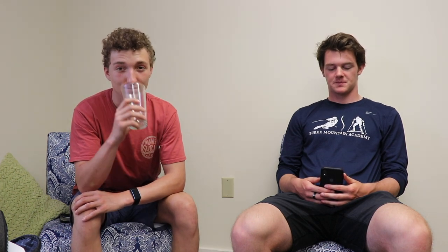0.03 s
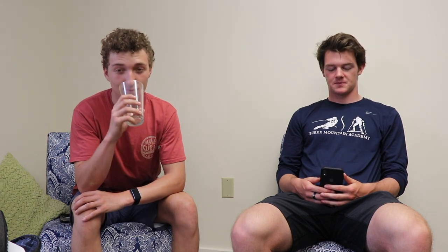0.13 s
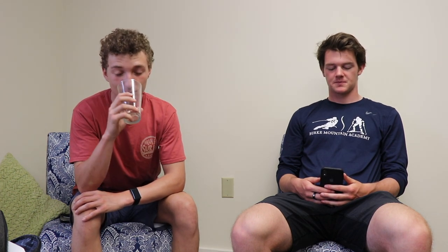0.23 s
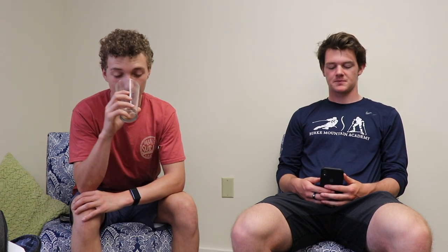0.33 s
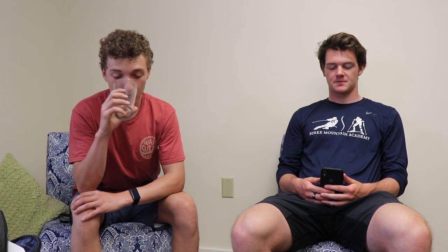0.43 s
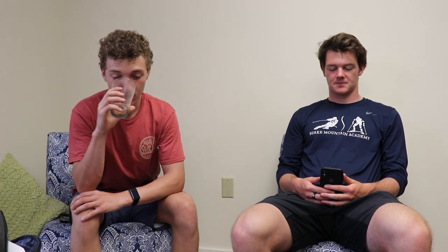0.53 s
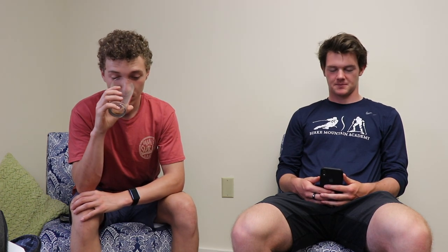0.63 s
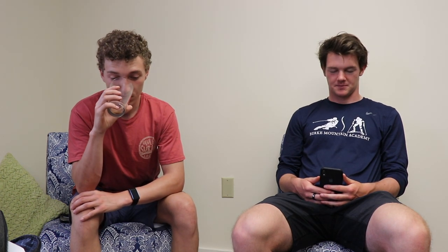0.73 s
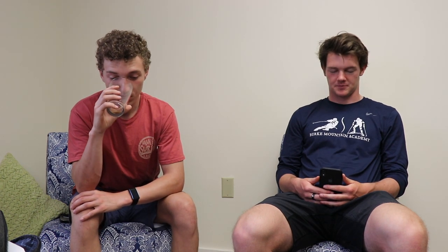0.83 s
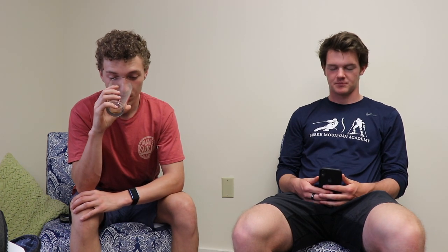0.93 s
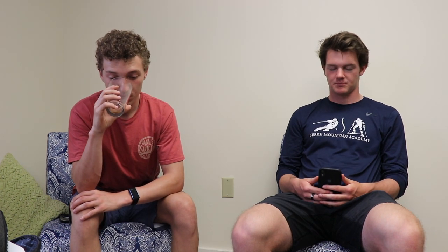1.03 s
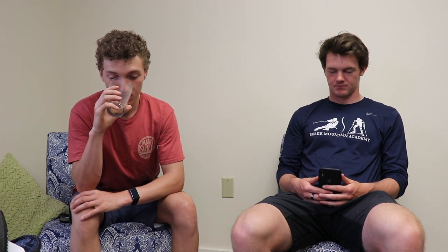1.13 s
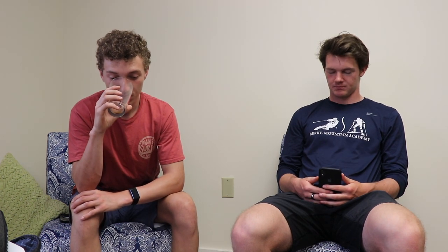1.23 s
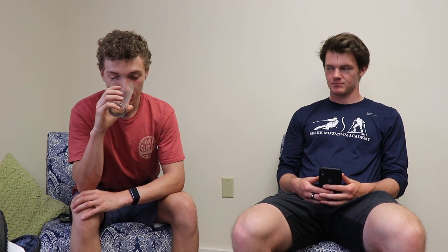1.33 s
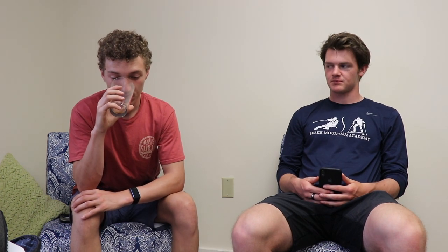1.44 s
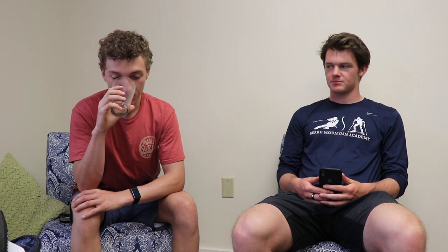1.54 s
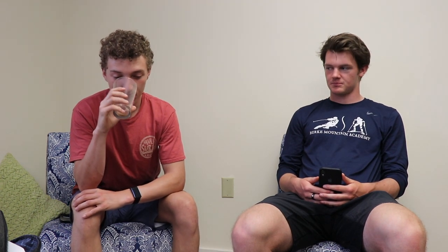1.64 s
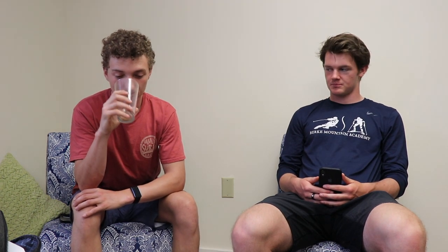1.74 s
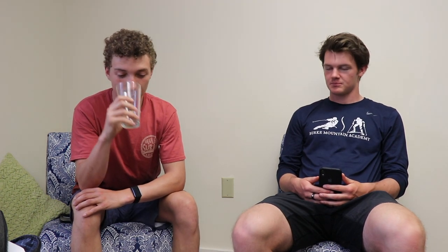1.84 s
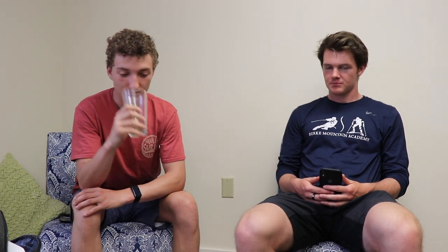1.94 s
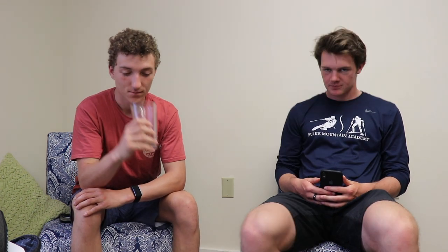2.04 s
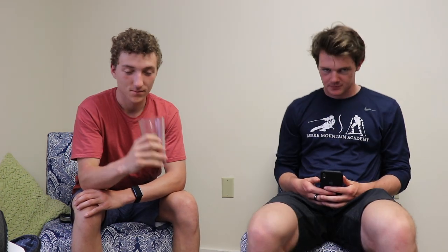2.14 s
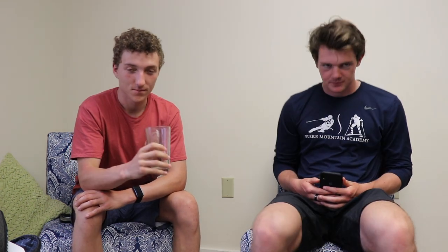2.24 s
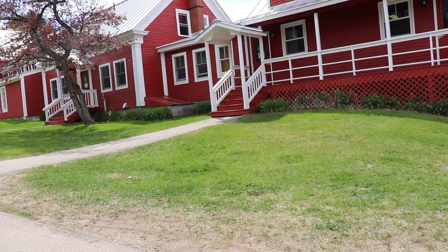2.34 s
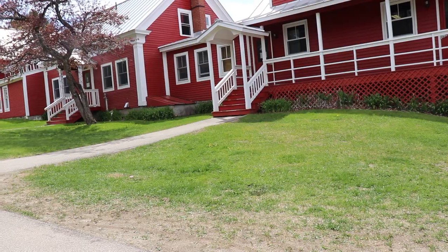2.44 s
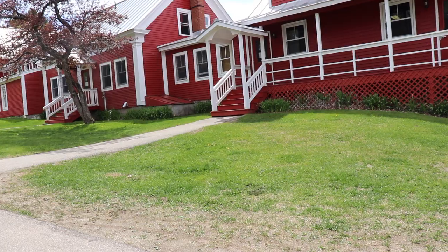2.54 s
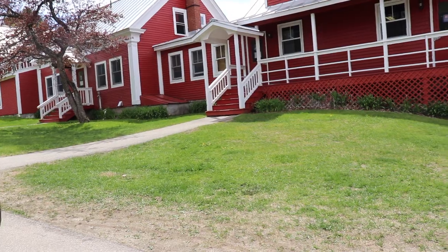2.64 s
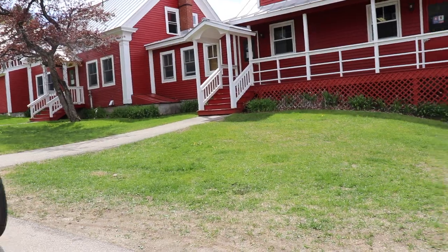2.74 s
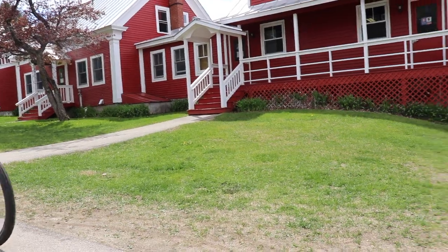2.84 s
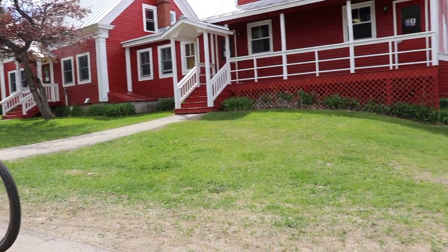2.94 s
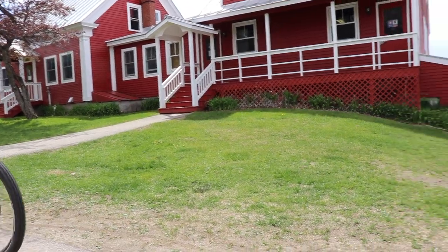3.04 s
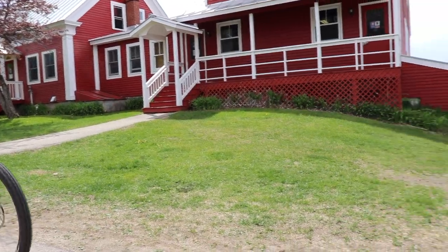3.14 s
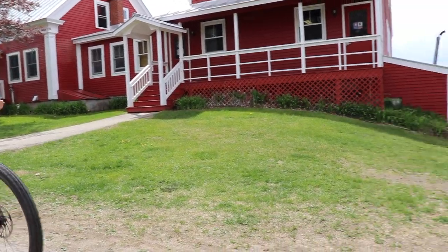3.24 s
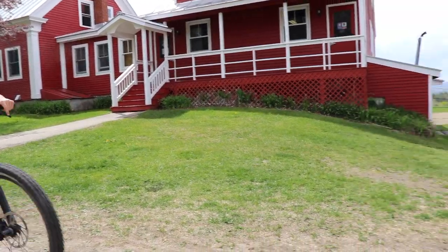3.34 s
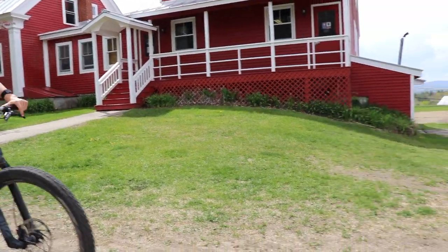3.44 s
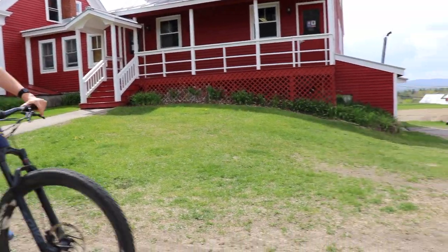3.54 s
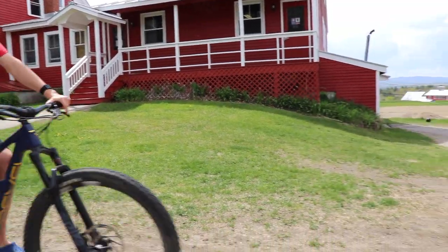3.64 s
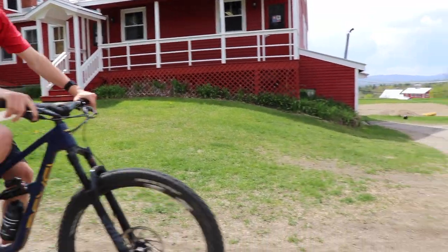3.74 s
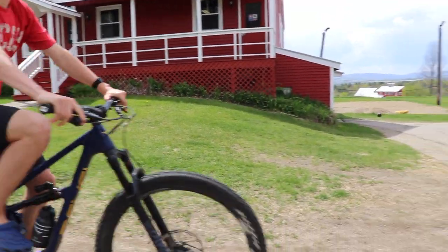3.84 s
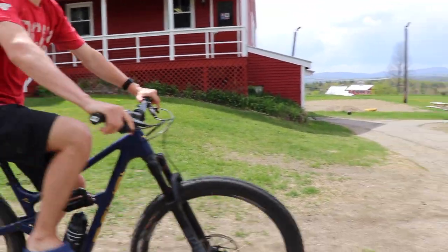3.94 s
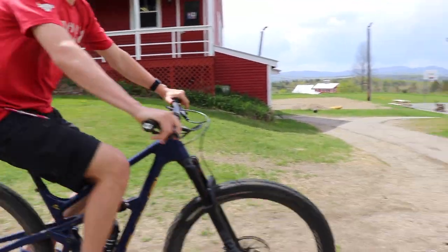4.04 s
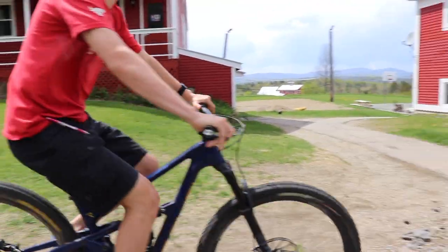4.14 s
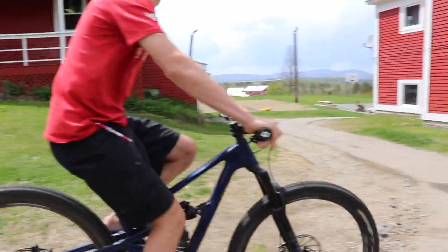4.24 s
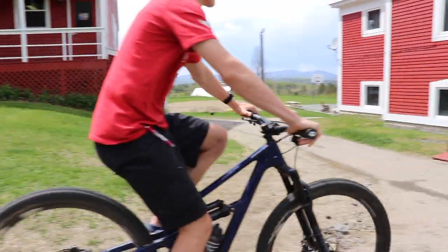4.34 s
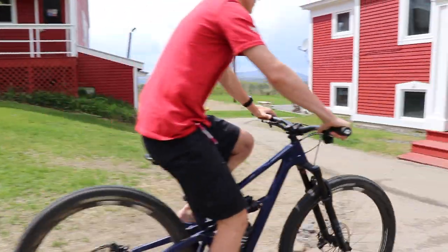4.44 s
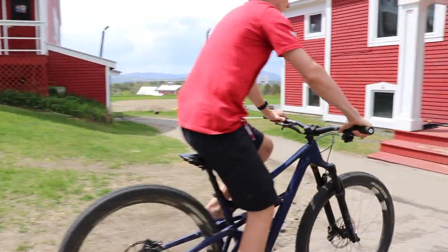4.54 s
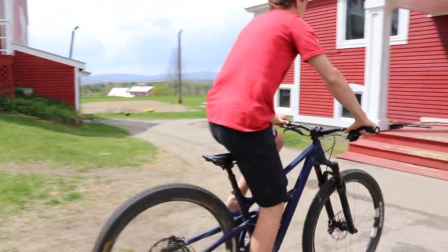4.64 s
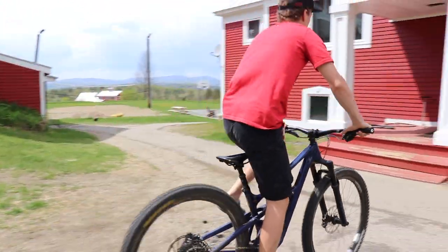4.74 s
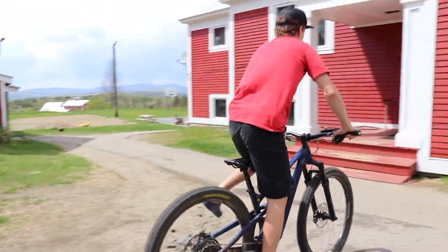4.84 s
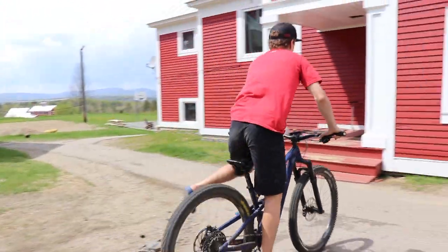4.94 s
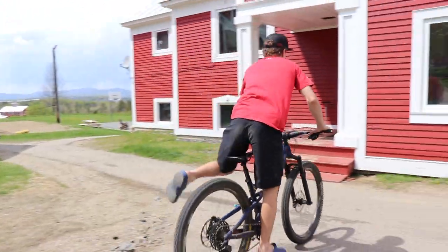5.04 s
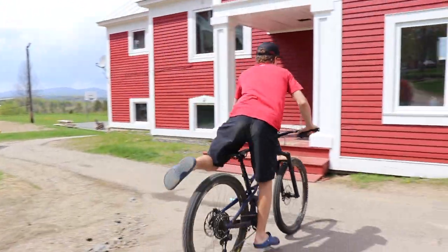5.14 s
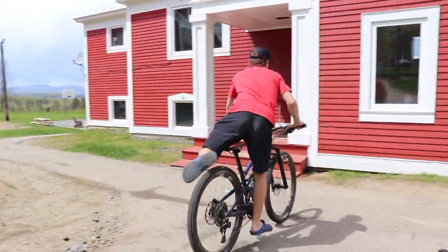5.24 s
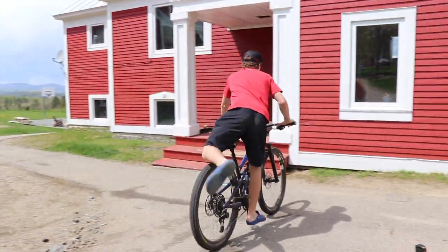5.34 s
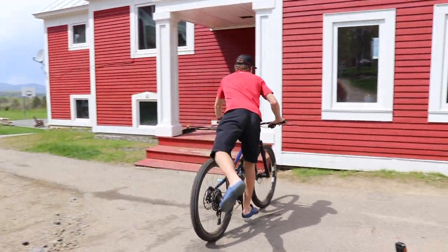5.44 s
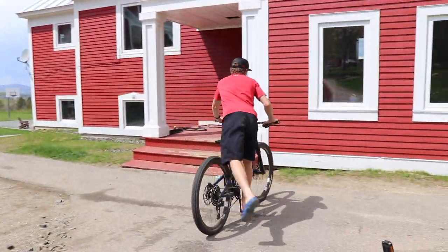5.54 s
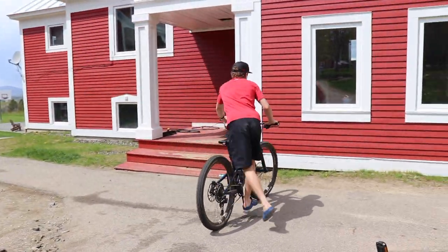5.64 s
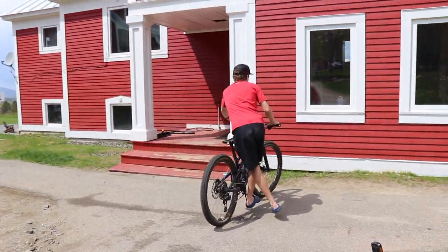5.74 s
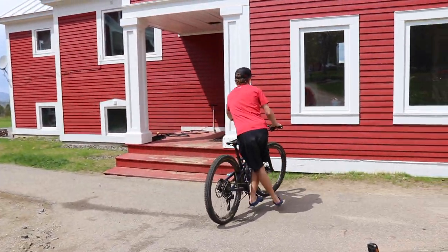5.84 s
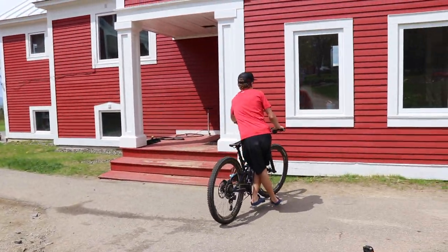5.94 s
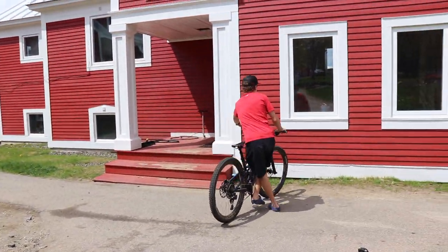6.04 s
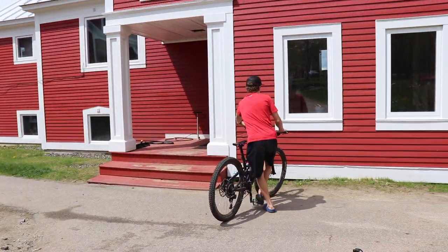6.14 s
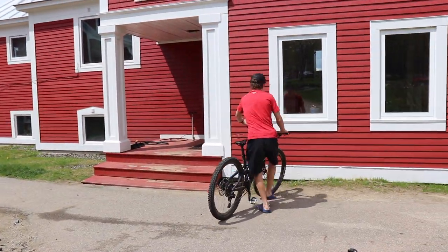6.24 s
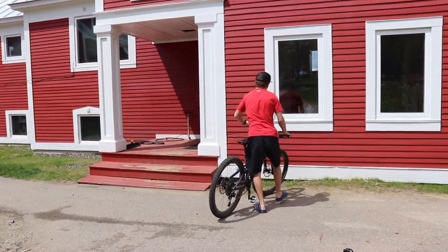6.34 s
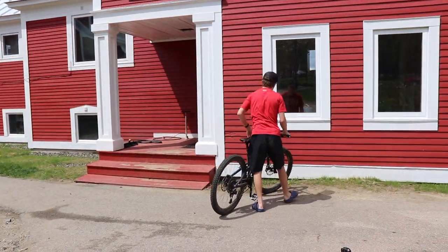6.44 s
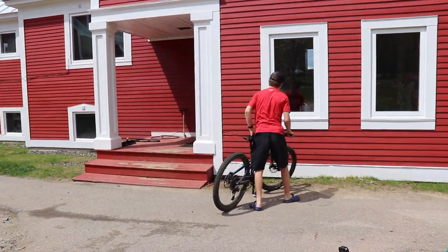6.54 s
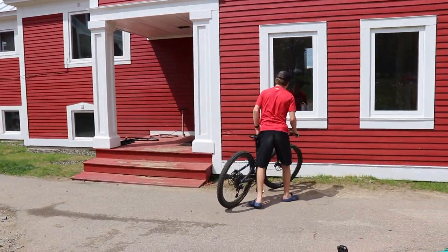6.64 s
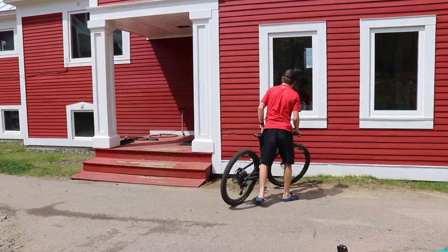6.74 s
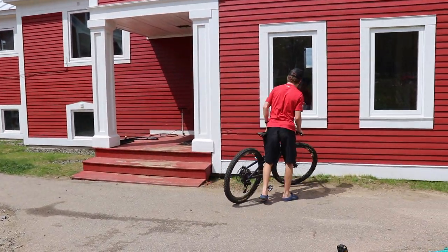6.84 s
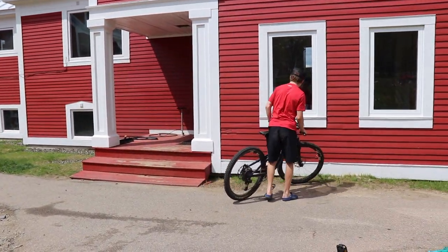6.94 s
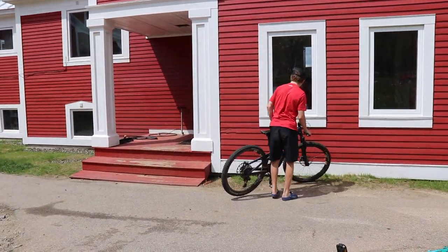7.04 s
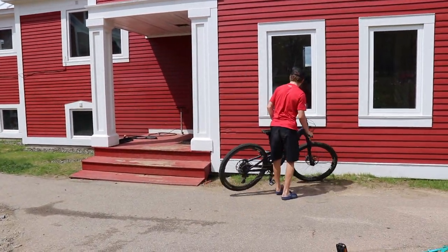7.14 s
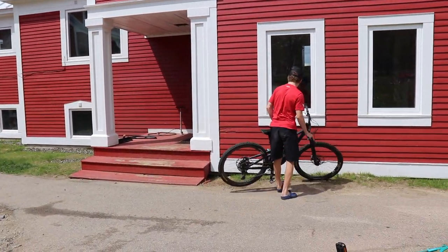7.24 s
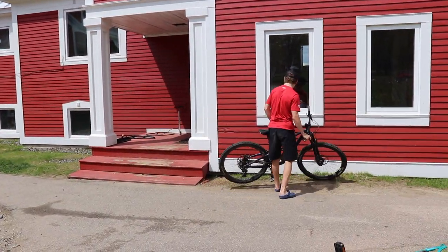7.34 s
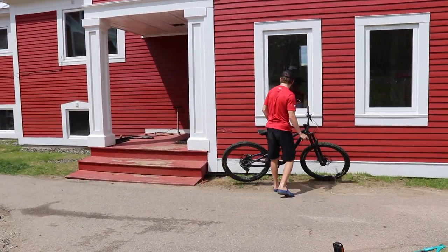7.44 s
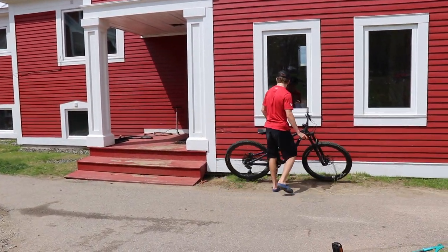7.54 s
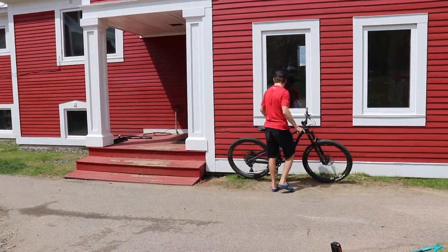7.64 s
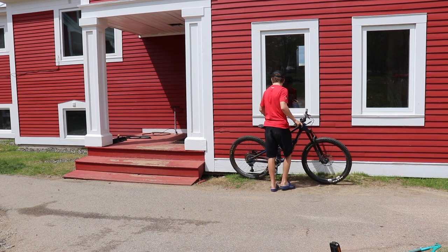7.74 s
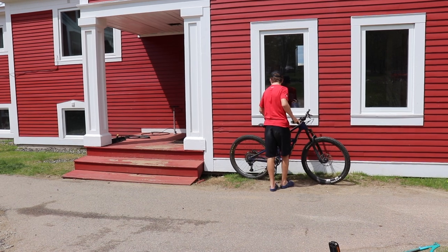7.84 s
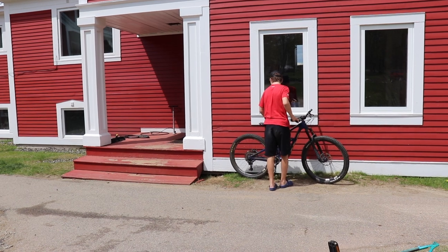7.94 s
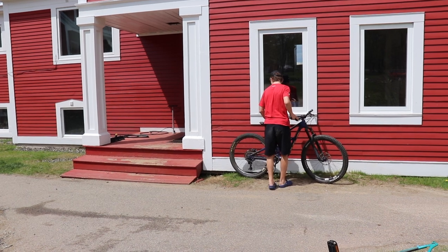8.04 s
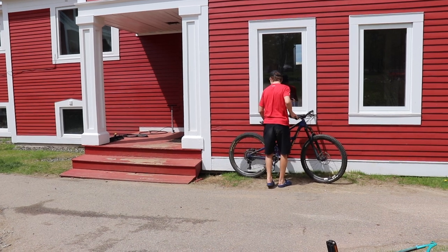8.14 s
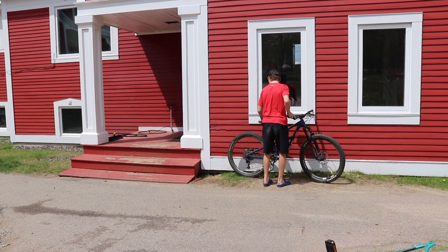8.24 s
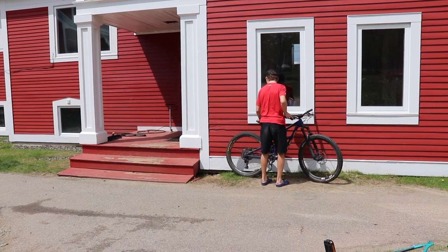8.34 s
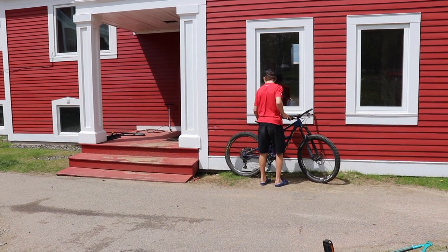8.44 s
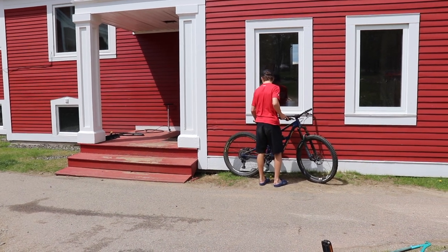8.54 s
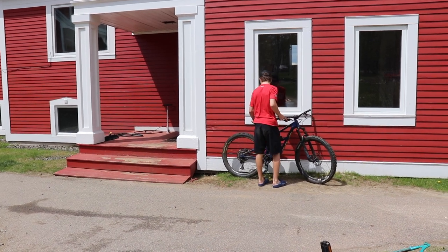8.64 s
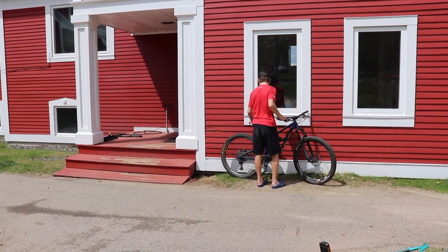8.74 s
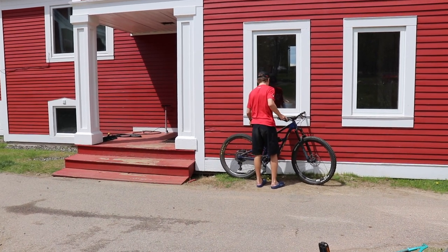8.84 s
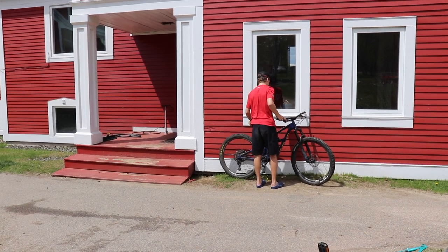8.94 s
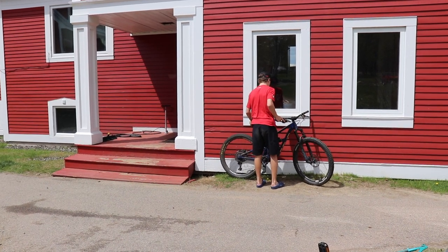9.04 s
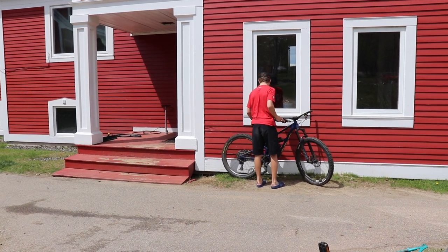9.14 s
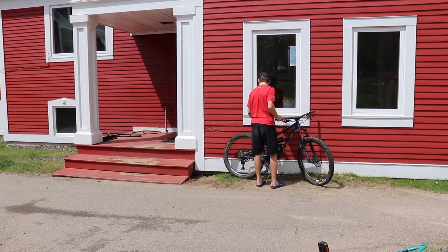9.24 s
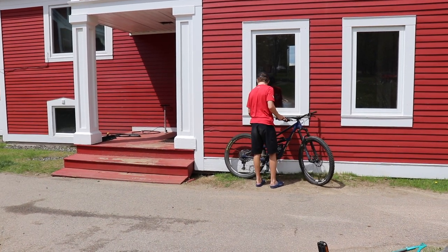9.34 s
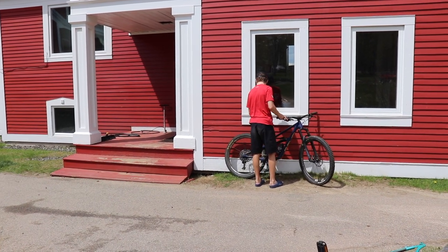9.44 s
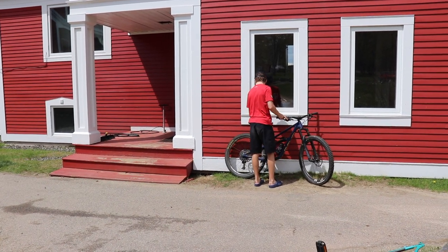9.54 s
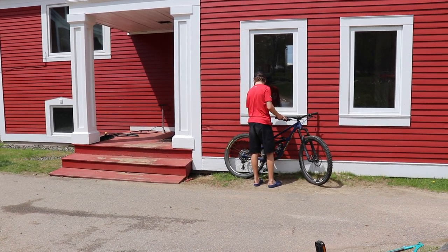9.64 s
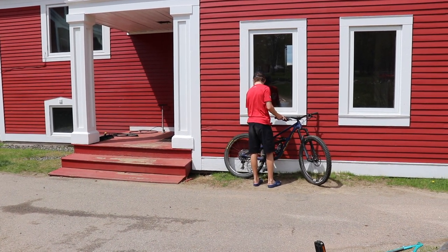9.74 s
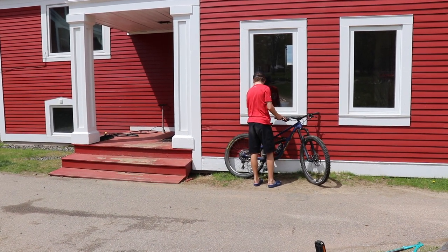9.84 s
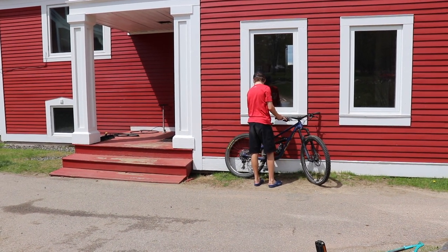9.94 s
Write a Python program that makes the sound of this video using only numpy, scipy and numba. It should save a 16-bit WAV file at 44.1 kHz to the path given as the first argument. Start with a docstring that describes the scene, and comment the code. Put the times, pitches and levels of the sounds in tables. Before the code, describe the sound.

A bicycle rolls in from the left over grit, its freewheel ratchet buzzing and slowing, then bumps a wall and clicks lightly.

```python
"""A quiet room with a rustle and one dull knock fades into a yard, where a bicycle rolls in from the left.
Its freewheel buzzes as four pawls (small spring catches) click over each tooth. Tyres and shoes
crunch grit and the tread hums. The frame clanks; the bicycle bumps a wooden wall and rolls a few
teeth more. A far bird chirps, and light gusts rumble on the microphone."""
import sys
import numpy as np
from scipy import signal
from scipy.fft import rfft, irfft
from scipy.io import wavfile
from scipy.ndimage import uniform_filter1d, map_coordinates
from numba import njit

SR = 44100
rng = np.random.default_rng(int(sys.argv[2]) if len(sys.argv) > 2 else 0)


def transcribe(signal):
    """Save signal, clipped to [-1, 1], as a 16-bit WAV file at the path in sys.argv[1]."""
    frames = np.atleast_2d(signal).T
    limited = np.clip(frames, -1, 1)
    pcm = np.round(limited * 32767).astype(np.int16)
    wavfile.write(sys.argv[1], SR, pcm)


N = 440118
T = np.arange(N) / SR
FADE_S = (1.89, 2.46)  # room into yard

# coasting; the pedals nearly catch the wheel at 4.02 s: t/s, teeth per second, relative level/dB
COAST = [(3.645, 41, -45), (3.9, 112, -39.5), (3.99, 56, -40.5), (4.02, 14, -37), (4.07, 40, -41.5),
         (4.14, 89, -36.5), (4.3, 98, -34.5), (4.51, 148, -26.5), (4.67, 127, -30.5), (5.22, 123, -34),
         (5.5, 112, -38.5), (5.95, 83, -39.5), (6.12, 38.6, -44.5), (6.45, 38, -43.5), (6.7, 63, -42),
         (6.95, 54, -42), (7.45, 50, -40.5), (7.62, 23, -42.5), (7.845, 27.4, -46)]
# single teeth while the wheel barely turns: t/s, time per tooth/s, relative level/dB
SLOW_TEETH = [(3.4148, .062, -43.5), (3.461, .101, -46), (3.5426, .082, -43.5), (3.607, .05, -45),
              (9.184, .0855, -40), (9.272, 0.072, -39), (9.3553, 0.09, -39.5), (9.4574, 0.14, -39.5)]
# where each pawl drops: share of one tooth step
PAWL_PLACES = [0, .17, .42, .49]
# how hard each pawl clicks: relative level/dB
PAWL_DB = [-2, -6, 0, -4]
def pawl_clicks():
    """Every pawl drops off every tooth. Gives the loudness outline of the clicks and their fading tails."""
    rate, coast_db = columns(COAST)
    turning = (T > COAST[0][0]) & (T < COAST[-1][0])
    teeth = np.cumsum(rate * turning) / SR
    fast, slow = np.zeros((2, N))
    for place, pawl_db in zip(PAWL_PLACES, PAWL_DB):
        timing, force = rng.standard_normal((500, 2)).T
        at = np.searchsorted(teeth, np.arange(500) + .02 + place + .012 * np.clip(timing, -1.5, 1.5))
        np.add.at(fast, at[at < N], undb(pawl_db + 2 * force[at < N]))
        for s, tooth_s, db in SLOW_TEETH:
            slow[int((s + place * tooth_s) * SR)] = undb(db + pawl_db)
    # a short click, then a fainter, longer tail
    fast, slow = (fading(v, .035) + undb(-15) * fading(v, .13) for v in (fast, slow))
    # even out the power, so faster clicking is not louder by itself
    power = uniform_filter1d(fast ** 2 * turning, SR // 8)
    power /= uniform_filter1d(1. * turning, SR // 8) + 1e-9
    held = np.clip(np.arange(N), *np.flatnonzero(turning)[[0, -1]])
    return fast * undb(coast_db) / np.sqrt(power[held]) + slow


# tone of the rattle: f/Hz, relative level/dB
HUB_TONE = [(530, -34), (900, -34), (1470, -13.5), (1790, -4), (1920, -3.5), (3150, 0.5), (5040, -13),
            (7310, -9), (8550, -10.5), (13700, -9.5), (16000, -12)]
# ringing of hub shell and spokes: f/Hz, width/Hz, relative level/dB
HUB_RINGS = [(2274, 25, 6), (2970, 11, 3.5), (3730, 16, -1), (6120, 63, 0), (7140, 200, 2.5),
             (7510, 690, 2), (9170, 170, -3), (10630, 370, -2), (13000, 260, -1), (14300, 560, -1)]
# strongest part of the buzz as the wheel turns towards us and away: t/s, f/Hz, boost/dB
BUZZ_PEAK = [(3.4, 2150, 16), (3.9, 2090, 12), (4.2, 2400, -2), (4.45, 3120, 4), (4.85, 2700, 8),
             (5.2, 2212, 11), (6.3, 2380, 6.5), (6.9, 2500, 5), (7.2, 2920, 4), (7.45, 3228, 2),
             (7.85, 2677, 2), (9.2, 2830, 1)]
def freewheel():
    """The clicking pawls rattle the hub and make its shell and spokes ring."""
    clicks = pawl_clicks()
    treble_size = np.std(passed(colour(pair(1), HUB_TONE), 5500, "high", order=4))
    rattle = undb(-1.5) / treble_size * colour(clicks * pair(.65), HUB_TONE)
    peak_hz, boost_db = columns(BUZZ_PEAK)
    hub = rattle + (undb(boost_db) - 1) * np.array([resonate(v, peak_hz, width=163.) for v in rattle])
    for hz, width, db in HUB_RINGS:
        # the wheel turns, so each ring swells, fades and shifts a little
        centre = hz * (1 + .0019 * drift(3.2))
        hub += undb(db + 2.7 * drift(15)) * np.array([resonate(v, centre, float(width)) for v in rattle])
    # from the side the hub is brighter
    bright_db = -.2 + 3.5 * direction()
    hub += (undb(bright_db) - 1) * passed(hub, 14300, "high", order=1)
    # the treble leans furthest to the left
    return passed(hub, 5340, "high") * follow(TREBLE_PAN_DB) - passed(hub, 6550, "low") * follow(MID_PAN_DB)


# steady rolling over grit: t/s, relative crunch level/dB, relative rumble level/dB
ROLLING = [(1.8, -58, -66), (2.07, -53.5, -54.5), (2.78, -49.5, -50.5), (3.23, -50.5, -46.5),
           (3.71, -40, -43), (4.4, -38, -39), (4.75, -33.5, -39), (5.33, -35, -41), (6.1, -40.5, -50),
           (6.45, -47.5, -54), (7.25, -54, -66), (7.7, -42, -50.5), (7.93, -46, -54), (8.05, -60.5, -63),
           (9.98, -63, -61)]
# shoes and tyres scuffing: peak t/s, relative level/dB, length/s
SCUFFS = [(6.218, -23, 0.064), (6.37, -41, 0.05), (6.591, -40.5, 0.15), (7.016, -42.5, 0.12),
          (7.495, -46.5, 0.069), (7.7, -39, 0.046), (8.134, -45.5, .06), (8.269, -41, 0.022),
          (8.377, -38.5, .06), (8.97, -52, 0.24), (9.646, -57, 0.047), (9.925, -59, .06)]
# tone of the grit: f/Hz, relative level/dB
CRUNCH_TONE = [(700, -20), (1100, -0.5), (1500, 3), (2300, 4), (3200, 1.5), (4500, -8), (7000, -11.5),
               (12000, -29)]
# tone of the tyre body: f/Hz, relative level/dB
RUMBLE_TONE = [(60, -16), (120, -9), (290, 4), (600, -1), (900, -8.5), (1400, -24.5)]
def grit():
    """Many grains, big and small, crack under tyres and shoes while the tyre body rumbles."""
    crunch_db, rumble_db = columns(ROLLING)
    scuffs = sum(undb(db - 18 * np.abs((T - s) / length) ** 1.1) for s, db, length in SCUFFS)
    grains_per_s, patchy_db = 1800, 1.5
    grains = (rng.random(N) < grains_per_s / SR) * undb(3.04 * rng.exponential(size=N))
    cracks = fading(grains, t60=.014) * pair(.84)
    crunch = level(colour(cracks, CRUNCH_TONE), .86) * follow(MID_PAN_DB)
    crunch *= np.hypot(undb(crunch_db + patchy_db * drift(12)), scuffs)
    rumble = level(colour(pair(.96), RUMBLE_TONE), -.31)
    rumble *= np.hypot(undb(rumble_db + patchy_db * drift(12)), undb(-11.5) * scuffs)
    return (crunch + rumble) * np.clip((T - FADE_S[0]) / .21, 0, 1)


# hum of the tyre knobs: t/s, f/Hz, level/dB
TREAD = [(2.9, 96.4, -58.5), (3.826, 122.1, -48.5), (3.92, 111.7, -56.5), (4.476, 136, -54),
         (4.8, 111.7, -53)]
def tread_hum():
    """The tyre's knobs meet uneven ground, so their hum wavers."""
    hz, db = columns(TREAD)
    fade = np.clip((T - TREAD[0][0]) / .26, 0, 1) * np.clip((TREAD[-1][0] - T) / .19, 0, 1)
    tone = np.sqrt(2) * np.sin(2 * np.pi * np.cumsum(hz) / SR)
    return tone * undb(db + 4.5 * drift(12)) * fade


# small ticks: t/s, level/dB, middle f/Hz
TICKS = [(2.276, -39, 2600), (2.423, -40, 1100), (2.624, -35.5, 1900), (2.738, -43, 6500),
         (2.762, -25.5, 1810), (2.764, -45, 7450), (2.81, -37.5, 1800), (3.064, -30, 2240),
         (3.281, -51, 11000), (3.361, -33, 1100), (3.385, -47, 5000), (3.442, -31.5, 3500),
         (3.487, -35, 1510), (3.543, -30, 2000), (4.039, -19.5, 2470), (4.535, -14.5, 5400),
         (4.579, -20, 2800), (5.579, -25, 2360), (6.551, -33, 4010), (6.847, -30.5, 3500),
         (7.508, -26.5, 2350), (7.88, -34, 1795), (7.958, -33, 2130), (8.14, -33, 1850), (8.2, -39, 2500),
         (8.249, -34, 1760), (8.281, -38, 1590), (8.348, -29.5, 2330), (8.89, -49, 1600),
         (9.069, -46.5, 1990), (9.635, -43, 1330), (9.936, -52, 2490)]
def ticks():
    """Stones, pedal and cable each tick with a tiny puff of noise."""
    return sum(placed(s, undb(db) * burst(hz / 1.4, hz * 1.38, t60=.033)) for s, db, hz in TICKS)


# low bumps: t/s, level/dB, f/Hz, ring time/s (the time to fade by 60 dB, called t60)
BUMPS = [(6.12, -39, 248.7, .06), (6.42, -32, 232.5, 0.11), (6.61, -38, 238, .06), (6.78, -39, 249.4, .093),
         (7.695, -38, 320, .08), (8.282, -31.5, 73, .37), (9.577, -38, 108, .13), (9.891, -42, 114, .092)]
def frame_bumps():
    """Each bump sends one low note through the frame."""
    return sum(placed(s, -undb(db) * ring([(hz, 0, t60)], push_s=.0029)) for s, db, hz, t60 in BUMPS)


# notes of the wooden wall: f/Hz, relative level/dB, ring time/s
WALL_NOTES = [(102.3, -.5, .073), (195, -9.5, .087), (330, -22, .15), (690, -24, .06)]
def wall_thud():
    """The bicycle hits the wall and the wood booms briefly."""
    return placed(8.2505, -undb(-11.5) * ring(WALL_NOTES, push_s=.0036))


# notes of the frame: f/Hz, relative level/dB, ring time/s
FRAME_NOTES = [(291, -17, 0.43), (610, -12.5, 0.27), (740, 2, 0.15), (790, -7, 0.15), (1041, 4, 0.083),
               (1960, -1, 0.13), (2110, -4.5, 0.1), (2620, -14, 0.061)]
def frame_clank():
    """The frame rings once with several notes together."""
    return placed(6.214, undb(-19.5) * ring(FRAME_NOTES, push_s=.0081, smear=.3))


# notes of a chain link: f/Hz, relative level/dB, ring time/s
LINK_NOTES = [(10000, -10, 0.61), (11600, -19, .25), (12800, -7, .12)]
def chain_jingle():
    """Chain links touch on the left, each with a click and a high ring."""
    out = np.zeros((2, N))
    for s in (2.927, 2.94, 2.953, 2.968, 2.988):
        touch = burst(6000, 15500, t60=.07) + undb(-8) * ring(LINK_NOTES, push_s=.001, smear=.5)
        out += placed(s, undb(-44) * touch)
    return out * panned(6)


# notes of the knocked wood: f/Hz, relative level/dB, ring time/s
KNOCK_NOTES = [(288, 3, 0.26), (422, -7, 0.32), (511, -12, 0.41), (605, -3, 0.23), (920, -31, 0.19),
               (1310, -8, 0.066), (1720, -26, .1)]
def knock():
    """A wooden body is knocked indoors and the walls answer."""
    wood = undb(-23.5) * ring(KNOCK_NOTES, push_s=.0047, smear=.46)
    low = undb(-28) * burst(250, 630, t60=.34)
    middle = undb(-33) * burst(300, 1350, t60=.22, channels=2)
    high = undb(-40) * burst(1500, 4400, t60=.19, channels=2)
    return placed(1.037, wood + low + middle + high)


def rustle():
    """One faint puff of noise indoors."""
    return placed(.559, undb(-52) * burst(810, 2500, t60=.29))


# bird calls: t/s, length/s, start f/Hz, end f/Hz, level/dB
CHIRPS = [(8.785, .03, 4200, 3500, -61), (8.87, .04, 4000, 3450, -55), (8.92, .03, 3200, 3000, -59),
          (8.97, .07, 3600, 3400, -57), (9.14, .05, 3050, 2900, -56)]
def bird():
    """A far bird sings short, fluttering whistles that slide down."""
    out = np.zeros((2, N))
    for s, length, from_hz, to_hz, db in CHIRPS:
        progress = np.clip(T[:SR // 4] / length, 0, 1)
        whistle = np.sin(2 * np.pi * np.cumsum(from_hz + (to_hz - from_hz) * progress) / SR)
        flutter_db = 2 * drift(140)[:SR // 4]
        out += placed(s, undb(db + flutter_db) * np.sin(np.pi * progress) * whistle)
    return out


# strength of the wind: t/s, level/dB
WIND = [(2.0, -86), (2.4, -61), (2.9, -61), (3.4, -77), (5.5, -65), (7, -72), (9.9, -73)]
def wind():
    """Light gusts rumble on the microphone, more on the left."""
    gust_db = columns(WIND)[0] + 2.3 * drift(2.8)
    return level(passed(pair(1), (25, 90), "band"), gust_db) * panned(3)


# tone of the room's hush: f/Hz, relative level/dB
ROOM_TONE = [(12, -91), (20, -30), (49, -8), (120, -12.5), (154, 0), (377, -11), (446, -7.5), (660, -10),
             (897, -15.5), (2460, -21.5), (4420, -23), (16000, -34.5)]
# tone of the yard's hush: f/Hz, relative level/dB
YARD_TONE = [(12, -53), (20, -19.5), (116, -5.5), (210, -11), (293, -14), (446, -16.5), (574, -15),
             (738, -18.5), (1030, -19.5), (2990, -23.5), (16000, -38.5)]
def air(tone):
    """A steady hush: the bass is alike left and right, the treble is not."""
    bass = colour(pair(.9), [(400, 1), (1200, -19.5)])
    treble = colour(pair(.066), [(300, -5), (1000, 3.5)])
    return level(colour(bass + treble, tone), -51.5)


TREBLE_PAN_DB, MID_PAN_DB = (1.9, 11), (-4.5, 2)  # left minus right: (ahead, extra at far left)
# the bicycle's path: t/s, direction (1 far left, 0 ahead)
PATH = [(3.7, 1), (4.1, .75), (4.5, .4), (5.2, 0), (6.5, -.12)]
def direction():
    """Where the bicycle is at each moment."""
    return columns(PATH)[0]


def follow(pan_db):
    """Left and right volumes that follow the bicycle."""
    return panned(pan_db[0] + pan_db[1] * direction())


def panned(pan_db):
    return undb(np.vstack([pan_db, -pan_db]) / 2)


def undb(db):
    return 10 ** (np.asarray(db) / 20)


def level(x, db):
    return x * undb(db) / np.sqrt(np.mean(x ** 2))


def columns(table):
    """Each column after the time as a curve over all samples."""
    s, *rest = np.transpose(table)
    return [np.interp(T, s, c) for c in rest]


def placed(s, sound):
    """A silent stereo track with the sound starting at s seconds."""
    out, i = np.zeros((2, N)), int(s * SR)
    out[:, i:i + sound.shape[-1]] = sound[..., :N - i]
    return out


def pair(alike):
    """Left and right noise, from unrelated (0) to the same (1)."""
    mid, side = rng.standard_normal((2, N))
    return (np.sqrt(1 + alike) * mid + np.sqrt(1 - alike) * side * np.array([[1], [-1]])) / np.sqrt(2)


def drift(rate):
    """A smooth random curve of typical size 1, changing about rate times a second."""
    span = int(SR / rate)
    v = uniform_filter1d(uniform_filter1d(rng.standard_normal(N), span), span)
    return v / v.std()


def fading(train, t60):
    """Gives every spike a fading tail."""
    return signal.lfilter([1], [1, -1000 ** (-1 / (t60 * SR))], train)


def ring(notes, push_s, smear=0):
    """Fading notes after a push; smear roughens them to stand for echoes."""
    t = T[:SR // 4]
    out = 0
    for hz, db, t60 in notes:
        wobble = uniform_filter1d(rng.standard_normal((2, len(t))), 300)
        note = undb(db) * np.sin(2 * np.pi * hz * t) * 1000 ** (-t / t60)
        out += note * (1 + smear * wobble / wobble.std())
    return out * np.clip(t / push_s, 0, 1) / (1 + smear)


def burst(lo_hz, hi_hz, t60, channels=1):
    """A fading puff of noise between two frequencies."""
    noise = passed(rng.standard_normal((channels, SR // 4)), (lo_hz, min(hi_hz, 16000)), "band")
    return noise / noise.std() * 1000 ** (-T[:SR // 4] / t60)


def passed(x, hz, kind, order=2):
    return signal.sosfilt(signal.butter(order, hz, kind, fs=SR, output="sos"), x)


def colour(x, tone):
    """Shapes a sound's tone by (f/Hz, level/dB) points."""
    tone_hz, tone_db = np.transpose(tone)
    hz = np.maximum(np.fft.rfftfreq(2048, 1 / SR), 1)
    db = np.interp(np.log(hz), np.log(tone_hz), tone_db)
    cepstrum = irfft(np.log(undb(db)))
    # fold it so the filter never rings before a click
    cepstrum[1:1024] *= 2
    cepstrum[1025:] = 0
    response = irfft(np.exp(rfft(cepstrum)))
    return signal.oaconvolve(np.atleast_2d(x), response[None], axes=1)[:, :N]


@njit
def resonate(x, hz, width):
    """Keeps a narrow band around a moving frequency."""
    y, band, low = np.empty(len(x)), 0., 0.
    for i in range(len(x)):
        g, damping = np.tan(np.pi * hz[i] / SR), width / hz[i]
        v = (band + g * (x[i] - low)) / (1 + g * (g + damping))
        band, low, y[i] = 2 * v - band, low + 2 * g * v, damping * v
    return y


def scene():
    """The room's hush fades into the yard's, and the bicycle rolls in."""
    events = freewheel() + grit() + tread_hum() + ticks() * follow(MID_PAN_DB)
    events += frame_bumps() + wall_thud() + frame_clank() + chain_jingle() + bird()
    lag_samples = 8 * direction()  # sound from the left reaches the right side later
    events[1] = map_coordinates(events[1], [np.arange(N) - lag_samples], order=3, mode="nearest")
    outside = np.clip((T - FADE_S[0]) / (FADE_S[1] - FADE_S[0]), 0, 1)
    room = np.sqrt(1 - outside) * air(ROOM_TONE) + knock() + rustle()
    return events + room + np.sqrt(outside) * air(YARD_TONE) + wind()


def record(dry):
    """Cuts the very highest treble."""
    return signal.sosfilt(signal.ellip(10, .2, 70, 15950, fs=SR, output="sos"), dry)


dry = scene()
out = record(dry)
transcribe(out)
```